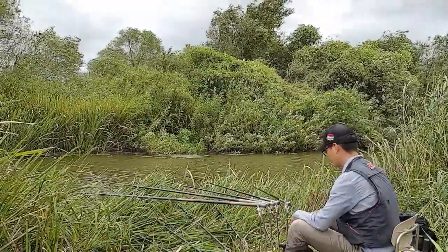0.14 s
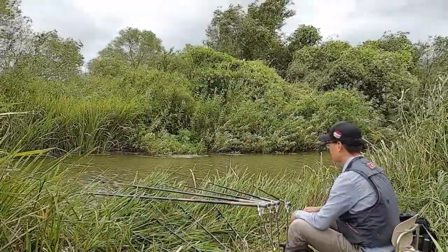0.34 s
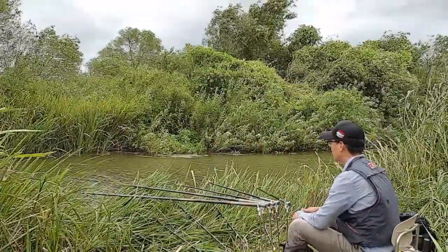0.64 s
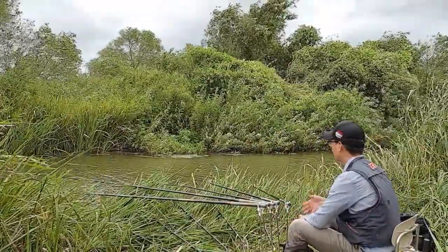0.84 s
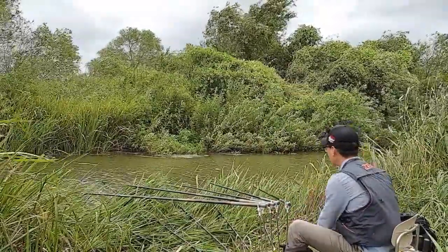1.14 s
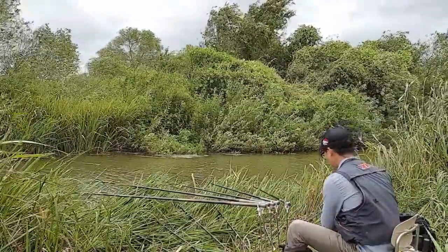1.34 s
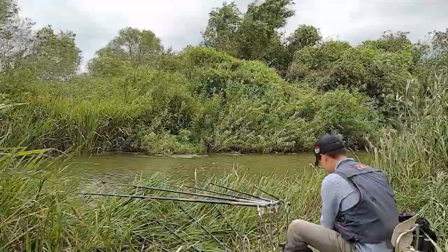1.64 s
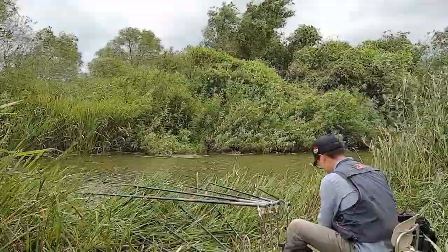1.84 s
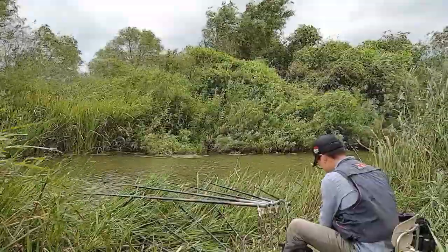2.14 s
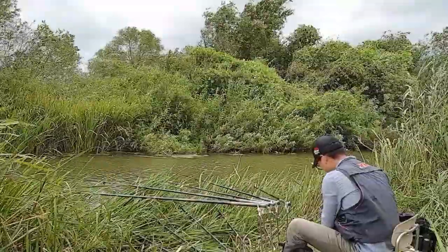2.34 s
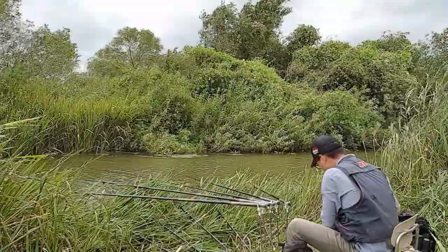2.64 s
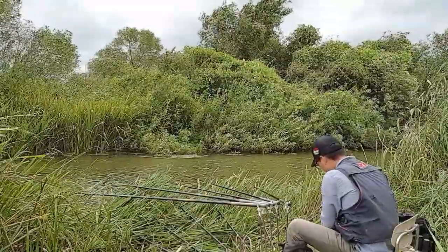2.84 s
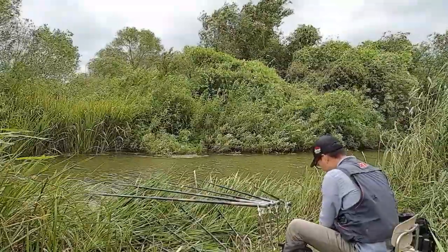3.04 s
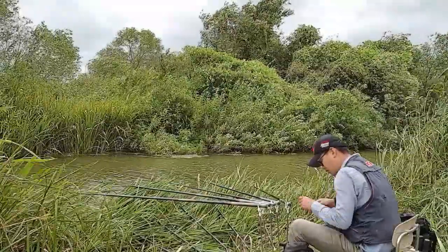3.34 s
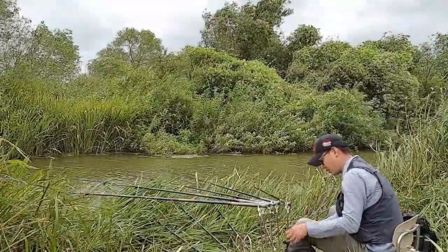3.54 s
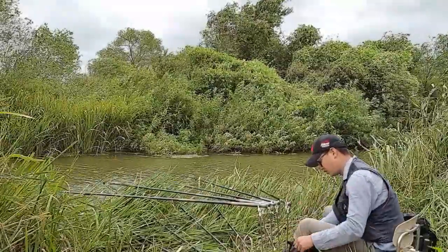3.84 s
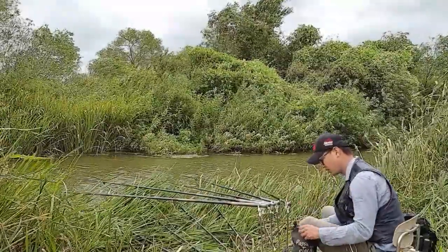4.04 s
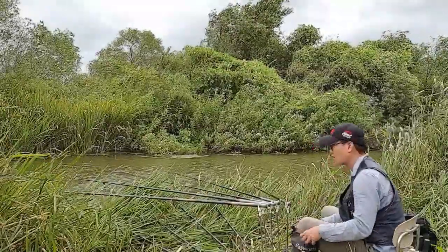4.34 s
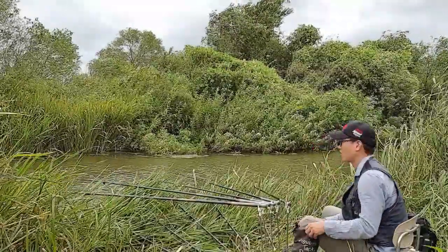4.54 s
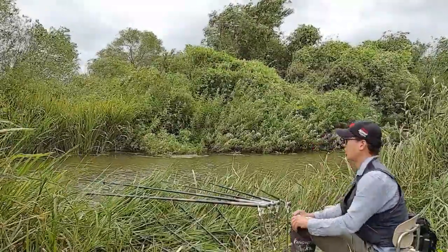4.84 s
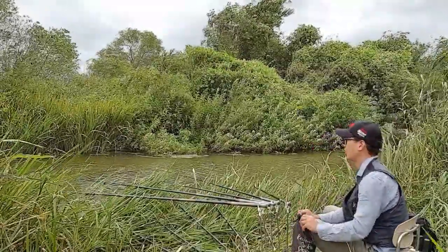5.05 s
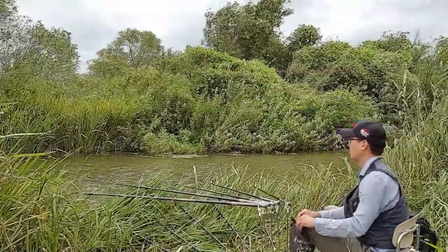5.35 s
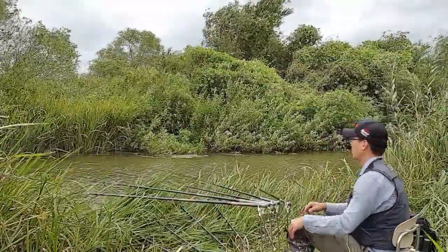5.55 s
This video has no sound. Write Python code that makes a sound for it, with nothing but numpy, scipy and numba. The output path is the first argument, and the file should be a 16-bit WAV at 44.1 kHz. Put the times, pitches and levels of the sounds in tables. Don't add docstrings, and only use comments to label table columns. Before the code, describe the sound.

A loud, constant insect chorus shimmers over rustling reeds as low wind buffeting bumps the microphone, then eases near the end.

```python
import sys
import numpy as np
from scipy import signal
from scipy.fft import rfft, irfft, next_fast_len
from scipy.io import wavfile
from scipy.ndimage import uniform_filter1d
from numba import njit

SR = 44100
rng = np.random.default_rng(int(sys.argv[2]) if len(sys.argv) > 2 else 0)


def voltage_ratio(level):
    return 10 ** (np.asarray(level, float) / 20)


def dump(signal):
    limited = np.clip(np.atleast_2d(signal).T, -1, 1)
    pcm = np.round(limited * 32767).astype(np.int16)
    wavfile.write(sys.argv[1], SR, pcm)


N = 251149
STEP = 32
TICKS = np.arange(N // STEP + 2) * STEP / SR


def unit(x):
    return x / np.sqrt(np.mean(x ** 2))


def fine(control):
    times = np.arange(N) / SR
    return np.squeeze([np.interp(times, TICKS, row) for row in np.atleast_2d(control)])


def walk(rate):
    hold = int(SR / STEP / rate)
    held = rng.standard_normal(N // 100)[np.arange(len(TICKS)) // hold]
    return 1.3 * uniform_filter1d(uniform_filter1d(held, hold), hold)


def colour(shape):
    hz, db = np.transpose(shape)
    size = next_fast_len(N)
    log_hz = np.log(np.arange(size // 2 + 1) * SR / size + 1)
    gain = voltage_ratio(np.interp(log_hz, np.log(hz), db, left=-90, right=-90))
    noise = irfft(rfft(rng.standard_normal(size)) * gain, size)
    return unit(noise[:N])


def delay(x, s):
    size = next_fast_len(N)
    hz = np.arange(size // 2 + 1) * SR / size
    return irfft(rfft(x, size) * np.exp(-2j * np.pi * s * hz), size)[:N]


def ports(near, left, right, lag_s):
    return np.array([delay(near, lag_s) + left, near + right])


def shares(near):
    near = np.clip(near, 0, 1)
    return np.sqrt([[near], [1 - near], [1 - near]])


def split(pan_db):
    return np.sqrt(2 / (1 + voltage_ratio(np.array([-pan_db, pan_db])) ** 2))


def gusts():
    # start in seconds, hold in seconds, thud level in dB, left minus right in dB,
    # flutter above the thud in dB.
    gust_rows = [(.12, .06, -45, 10, -3), (.22, .1, -39, -4, -7), (.62, .04, -41, 12, -4),
                 (.7, .09, -42, 0, 2), (.82, .1, -41, 6, -4), (.96, .12, -43, 5, -2),
                 (1.25, .1, -43, 8, -5), (1.42, .13, -41, 4, -3), (1.6, .06, -43, -2, -9),
                 (1.74, .13, -37, -3, -4), (1.9, .14, -36, 2, -6), (2.1, .1, -41, 6, 4),
                 (2.4, .12, -43, 10, 2), (2.57, .08, -38.5, 10, -4), (2.7, .13, -36, 6, 1),
                 (3.02, .04, -44, 22, -3), (3.1, .1, -48, 20, 6), (3.3, .09, -39.5, 0, -7),
                 (3.57, .08, -45, 12, 0), (3.84, .1, -46.5, 8, -5), (4.04, .08, -47, 6, -6),
                 (4.17, .18, -44, 6, -5), (4.89, .06, -49, 2, -3), (5.16, .02, -58, 12, -3)]
    rise_s, fall_s = .025, .035
    breeze_db, breeze_pan_db, breeze_flutter_db = -50, 16, -1
    breeze_ends_s, calm_db, calm_flutter_db = 4.39, -18, -7
    flutter_pan_db = -3

    breeze = voltage_ratio(breeze_db + 1.8 * walk(8))
    calm = np.clip((TICKS - breeze_ends_s) / .06, 0, 1)
    thud_power = (breeze * voltage_ratio(calm_db * calm) * split(breeze_pan_db)[:, None]) ** 2
    flutter_power = (breeze * voltage_ratio(breeze_flutter_db + calm_flutter_db * calm)) ** 2
    for s, hold_s, db, pan_db, flutter_db in gust_rows:
        rise = np.minimum(TICKS - s, 0) / rise_s
        fall = np.maximum(TICKS - s - hold_s, 0) / fall_s
        shape = np.exp(rise - fall)
        thud_power = thud_power + (shape * voltage_ratio(db) * split(pan_db)[:, None]) ** 2
        flutter_power = flutter_power + (shape * voltage_ratio(db + flutter_db)) ** 2
    return np.sqrt(thud_power), np.sqrt(flutter_power) * split(flutter_pan_db)[:, None]


def buffet():
    # frequency in Hz, level in dB per Hz.
    thud_shape = [(15, -18), (30, -5.5), (60, 0), (100, -4.5), (170, -6), (260, -10), (500, -40)]
    # frequency in Hz, level in dB per Hz.
    flutter_shape = [(120, -35), (220, -9.5), (320, 1.5), (480, -2), (700, -11.5), (1100, -24), (2000, -35),
                     (4000, -57)]
    thud_gain, flutter_gain = gusts()
    burst = walk(30)
    thud = [colour(thud_shape) * fine(unit(voltage_ratio(1.7 * burst + 2.3 * walk(24.98)))) for _ in range(2)]
    flutter = [colour(flutter_shape) * fine(unit(voltage_ratio(2.4 * burst + 3.3 * walk(55)))) for _ in range(2)]
    return thud * fine(thud_gain * voltage_ratio(2.3)) + flutter * fine(flutter_gain * voltage_ratio(.6))


def eddies(cycles=.6, edge=0.3):
    # time in seconds, pitch in Hz, left peak in dB, right peak in dB.
    large = [(.149, 86, -28, -33), (.176, 128, -27, -33), (.222, 90, -29, -27), (.248, 94, -26, -28),
             (.636, 141, -26.5, -47), (.745, 158, -19, -22), (.826, 125, -22.5, -43), (.911, 81, -20, -28),
             (.968, 101, -27, -28), (1.056, 120, -25, -28), (1.334, 91, -28, -34), (1.495, 88, -27, -30),
             (1.542, 85, -24, -30), (1.653, 83, -30, -31), (1.762, 105, -27, -27), (1.849, 131, -32, -20),
             (1.908, 108, -20, -17), (2.033, 118, -22, -25), (2.103, 142, -23.5, -30),
             (2.439, 112, -27, -44), (2.563, 132, -26, -25), (2.731, 113, -17, -31), (2.792, 87, -26, -29),
             (3.044, 76, -28, -46), (3.319, 101, -27, -28), (3.363, 100, -29, -26), (3.872, 91, -29, -33),
             (4.074, 97, -28.5, -34), (4.228, 95, -28, -36), (4.327, 76, -27, -31)]
    # time in seconds, left peak in dB, right peak in dB.
    small_rows = [(.01, -31, -27), (.223, -26, -25), (.742, -29, -23), (.793, -35, -24), (.906, -24, -25.5),
                  (.954, -29, -18.5), (1.0, -24, -31), (1.052, -21, -21), (1.244, -28, -42),
                  (1.426, -20.5, -23.5), (1.84, -18, -28), (1.861, -23, -30), (1.904, -22, -19),
                  (1.944, -23, -32), (1.996, -24, -24), (2.115, -17, -17.5), (2.166, -23, -23),
                  (2.195, -22, -26), (2.522, -31, -27), (2.608, -27, -20.5), (2.672, -23, -29),
                  (2.78, -28, -27), (2.725, -38, -19.5), (2.739, -21, -23.5), (2.764, -22, -28),
                  (2.817, -25, -21), (3.596, -27.5, -36), (4.054, -30, -33), (4.252, -31, -32),
                  (4.924, -35, -36)]
    # time in seconds, pitch in Hz, left peak in dB, right peak in dB.
    thumps = [
        (4.91, 72, -34, -32),
        (4.918, 160, -35, -38),
        (4.74, 66, -45, -52),
        (4.79, 65, -43, -46),
        (0.41, 75, -42, -36),
        (2.697, 540, -28, -16),
        (2.624, 500, -33, -22),
        (5.06, 60, -46, -42),
        (1.8, 130, -36, -27),
    ]
    small_hz = 355
    rows = large + [(s, small_hz, *db) for s, *db in small_rows] + thumps
    out = np.zeros((2, N + 2 * SR))
    for (s, hz, *peak_db), chance in zip(rows, rng.random((len(rows), 4))):
        smallness = hz / 400
        for side in range(2):
            pitch = hz * (0.84 + 0.31 * chance[side])
            reach = int(4 * SR / pitch)
            turns = np.arange(-reach, reach) * pitch / SR
            angle = 2 * np.pi * (turns + chance[2 + side])
            body = np.exp(-(turns / (cycles + 0.23 * smallness)) ** 2) * np.sin(angle)
            snap = np.exp(-(turns / .3) ** 2) * np.sin(2.2 * angle)
            gain = voltage_ratio(peak_db[side] + 0.3 - 1.6 * smallness)
            start = SR + int(s * SR) - len(turns) // 2
            out[side, start:start + len(turns)] += gain * (body + edge * smallness * snap)
    return out[:, SR:SR + N]


def reeds():
    # frequency in Hz, level in dB per Hz.
    rustle_shape = [(24, -53), (40, -19), (223, -11), (475, 1), (670, -2.5), (788, -3), (878, -3.5),
                    (1380, -7.3), (2500, -13), (3000, -19), (3900, -66), (6600, -120)]
    leaves = shares(0.54) * [colour(rustle_shape) for _ in range(3)]
    level_db = -48.35 + .5 * walk(4.8) + 1.3 * walk(24.94)
    return ports(*leaves, -17.5 / SR) * fine(voltage_ratio(level_db))


def tymbal(click=0.14):
    # place in the muscle cycle 0-1, click level in dB.
    ribs = [
        (0, 2),
        (.17, -4),
        (.34, 9),
        (0.498, -6),
        (0.682, -18.5),
        (0.849, -5),
    ]
    throb_hz = 37.8
    phase = np.cumsum(throb_hz * fine(1 + .012 * walk(3))) / SR
    return unit(sum(voltage_ratio(db) * np.exp(-((phase - place) % 1) / click) for place, db in ribs))


@njit
def svf(x, hz, width, step):
    y, g, k = np.empty_like(x), np.tan(np.pi * hz / SR), width / hz
    a = 1 / (1 + g * (g + k))
    for row in range(len(x)):
        band1, low1, band2, low2 = 0., 0., 0., 0.
        for i in range(x.shape[1]):
            j = i // step
            v = (band1 + g[j] * (x[row, i] - low1)) * a[j]
            w = (band2 + g[j] * (k[j] * v - low2)) * a[j]
            band1, low1 = 2 * v - band1, low1 + 2 * g[j] * v
            band2, low2 = 2 * w - band2, low2 + 2 * g[j] * w
            y[row, i] = k[j] * w
    return y


def voice(ribs, hz, width, share, depth):
    drive = rng.random((3, N)) - .5
    drive[0] *= 1 - depth + depth * ribs
    return unit(svf(drive, hz, float(width), STEP)) * shares(share)


def singers(ribs, depth=0.58, share=0.63):
    # start in seconds, end in seconds, first pitch in Hz, last pitch in Hz, level in dB.
    solos = [
        (-.5, 2.7, 6080, 6150, -10.5),
        (1, 2.3, 6620, 6560, -13),
        (1.8, 2.9, 5100, 5600, -11),
        (2.3, 4.5, 6130, 6250, -10),
        (4.5, 6, 6330, 6400, -10),
        (4.5, 5.6, 5580, 5760, -11),
        (1.5, 2.2, 4480, 4520, -11),
        (3.5, 6.3, 3520, 3590, -15),
        (0.1, 2.64, 3460, 3390, -18),
    ]
    width_hz = 270
    out = 0
    for start, end, first_hz, last_hz, db in solos:
        along = np.clip((TICKS - start) / (end - start), 0, 1)
        centre = (first_hz + along * (last_hz - first_hz)) * (1 + 0.01 * walk(5))
        swell = np.abs(np.sin(np.pi * along)) ** 0.36 * voltage_ratio(db + 1.25 * walk(8))
        out = out + voice(ribs, centre, width_hz, share, depth) * fine(swell)
    return out


def cicadas():
    # centre in Hz, width in Hz, level in dB, share from the near singers 0-1,
    # throb depth 0-1, chorus group (rounded: 0 plain, 1 low voice, 2 top voice, 3 overtones).
    body = [(3464, 485, -2.5, .55, 0.46, 1), (3806, 660, -12, 0.05, 0.1, 1.5),
            (4510, 620, -7.5, 0.41, 0.7, -0.5), (4970, 650, -8, 0.45, 0.7, -0.5),
            (5570, 720, -4, 0.29, 0.46, 2), (6230, 1200, -5, 0.64, 0.48, 2),
            (6960, 1440, -10.5, 0.28, 0.9, 2), (8050, 2700, -7.5, 0, .3, 3),
            (9250, 1950, -5.5, 0.17, 0.6, 3), (10920, 2700, -3, 0.42, 0.5, 3),
            (12350, 2600, -10.5, 0.2, 0.9, 3), (13800, 2400, -16, .1, .3, 3),
            (14700, 2400, -21, .08, .2, 3), (15450, 2400, -25, .08, .2, 3)]
    # time in seconds, level in dB.
    swell = [(0.0, -32), (0.2, -30), (1.36, -32), (1.39, -30), (2.12, -33), (2.41, -30), (2.44, -34),
             (2.58, -31), (3.01, -35), (3.14, -31), (4.07, -32), (4.09, -28), (4.2, -31), (4.79, -29),
             (4.86, -32), (5.02, -28), (5.58, -29), (5.69, -31)]
    # time in seconds, depth in dB.
    lulls = [(.06, -2), (.42, -2), (.69, -2.5), (1.2, -2), (1.34, -2), (1.72, -1.5), (2.16, -2),
             (2.63, -1.5), (2.9, -.7), (3.45, -1.2), (3.76, -2.5), (3.97, -2), (4.27, -1.5), (4.55, -2),
             (4.88, -2), (5.18, -1.5), (5.4, -1.5), (3.33, -1.5)]
    lull_s = .022
    even_s = .15

    level_db = np.interp(TICKS, *np.transpose(swell))
    steady_db = .5 * (level_db.mean() - level_db)
    level_db = level_db + sum(db * np.exp(-((TICKS - s) / lull_s) ** 2) for s, db in lulls)
    low_db = -10.5 + 1.2 * walk(9)
    top_db = -2.2 + .6 * walk(9)
    overtones_db = -12 + steady_db + 0.8 * walk(28)
    group_db = [0, low_db, top_db, overtones_db]

    ribs, shared = tymbal(), walk(24)
    out = singers(ribs)
    for hz, width, db, share, depth, group in body:
        band = voice(ribs, hz * (1 + 0.008 * walk(2.15)), width, share, depth)
        band_db = db + group_db[round(group)] + 0.6 * shared + 1.1 * walk(20)
        out = out + band * fine(voltage_ratio(band_db))
    power = out[0] ** 2 + out[1:].var(axis=0) * 2
    out = out / np.sqrt(uniform_filter1d(power, int(even_s * SR)))
    port_db = .95 + np.array([[2.1], [2.7]])
    return ports(*out, 13.9 / SR) * fine(voltage_ratio(level_db + port_db))


def rumble():
    shape = [(15, -20), (35, -3), (70, 3), (110, -10), (160, -25)]  # Hz, dB
    still_s, still_length_s, still_db = 4.51, .09, -10
    dip_db = still_db * np.exp(-((TICKS - still_s) / still_length_s) ** 2)
    return [colour(shape) * fine(voltage_ratio(-63.5 + dip_db + 2.2 * walk(13))) for _ in range(2)]


def puffs(rise_s=0.0028, fall_s=0.011):
    # time in seconds, peak in dB, left minus right in dB.
    breaths = [(0.539, -40, -0.5), (0.953, -46, -2.5), (2.147, -47, -4.0), (2.621, -32, -10),
               (2.695, -35, -4.5), (2.74, -38, -6.0), (2.979, -44, 0.0), (3.055, -38.5, -3.5),
               (3.131, -36.5, -6), (3.549, -41, -1.0), (4.049, -54, 1.0), (5.005, -44, -0.5)]
    shape = [(400, -22), (750, -1), (1200, -2), (1800, -13), (3000, -35)]  # Hz, dB
    swell = 0
    for s, db, pan_db in breaths:
        since = np.clip(TICKS - s, 0, 1)
        breath = (1 - np.exp(-since / rise_s)) * np.exp(-since / fall_s)
        swell = swell + voltage_ratio(db - 1.2) * split(pan_db)[:, None] * breath
    return fine(swell) * [colour(shape) for _ in range(2)]


def scene():
    return buffet() + eddies() + reeds() + cicadas() + rumble() + puffs()


def roll_off(x):
    return signal.sosfilt(signal.butter(12, 15780, fs=SR, output="sos"), x)


def record(dry):
    bass_cut = signal.butter(2, 38.0, "high", fs=SR, output="sos")
    mix = signal.sosfilt(bass_cut, dry)
    return roll_off(mix)


dry = scene()
out = record(dry)
dump(out)
```